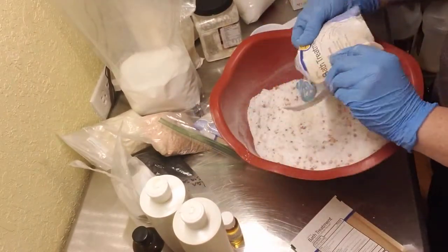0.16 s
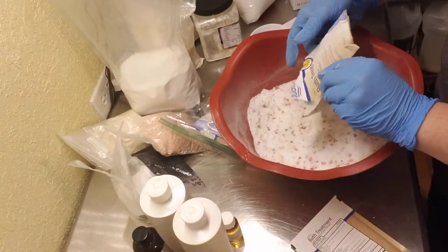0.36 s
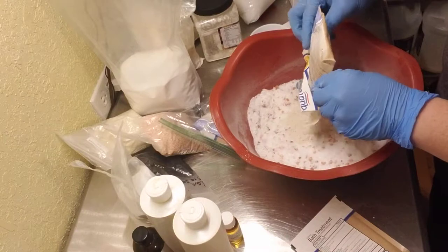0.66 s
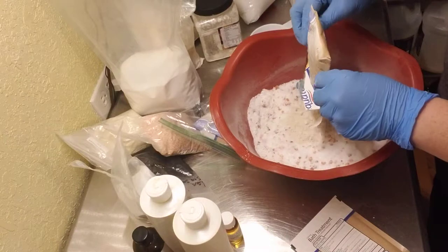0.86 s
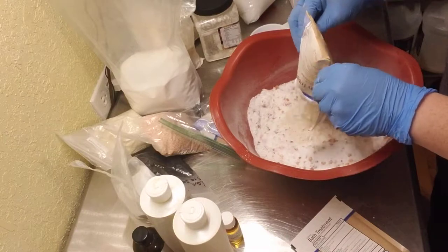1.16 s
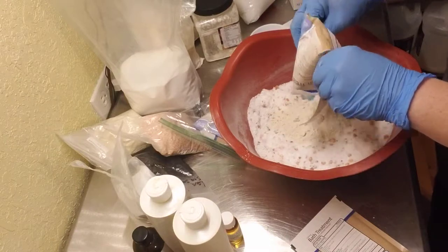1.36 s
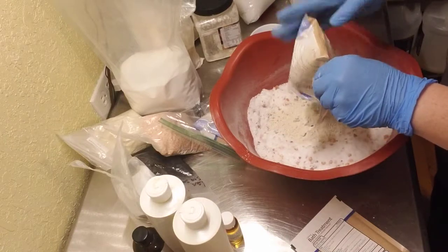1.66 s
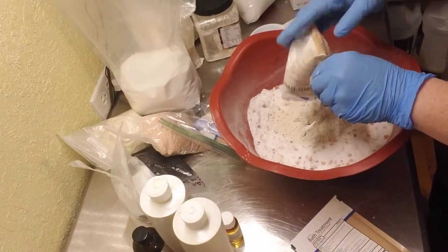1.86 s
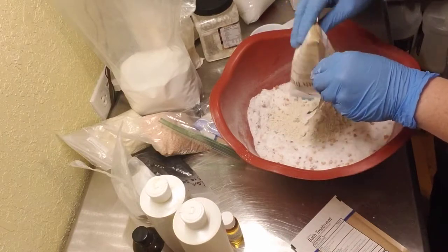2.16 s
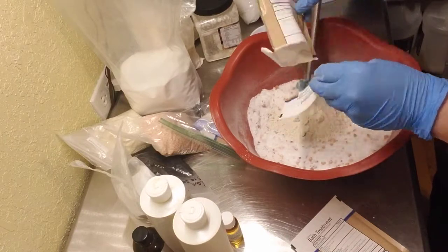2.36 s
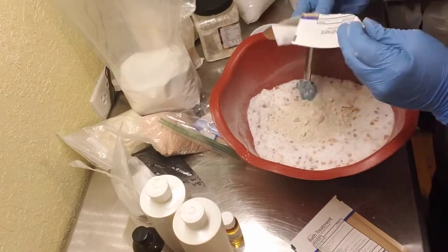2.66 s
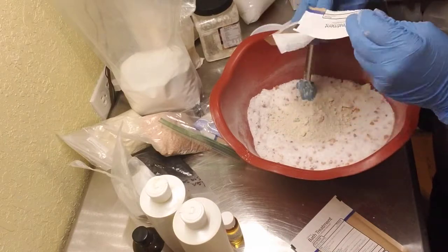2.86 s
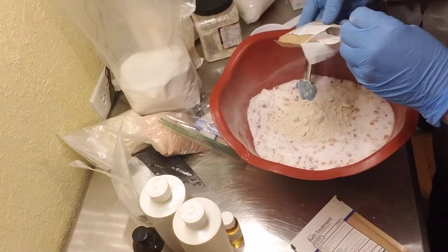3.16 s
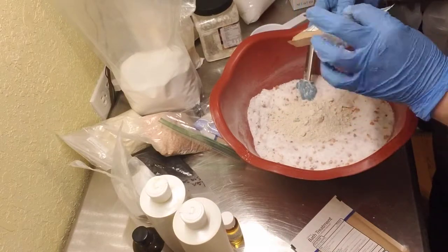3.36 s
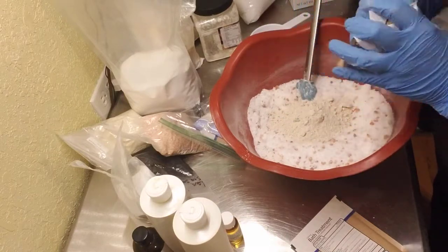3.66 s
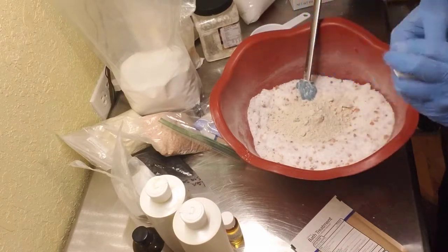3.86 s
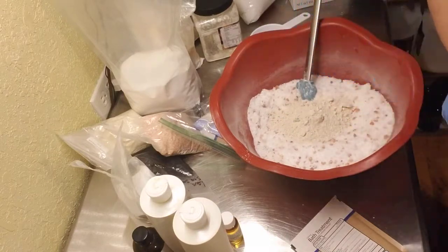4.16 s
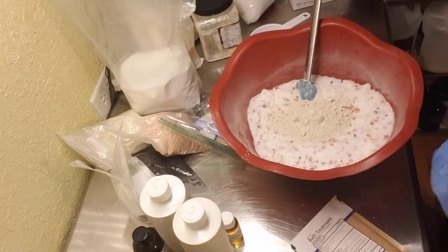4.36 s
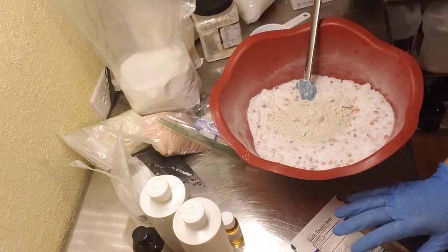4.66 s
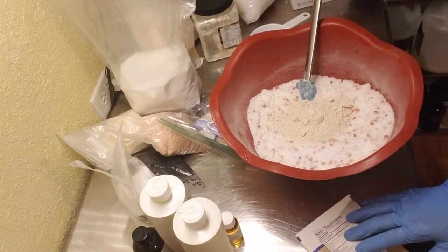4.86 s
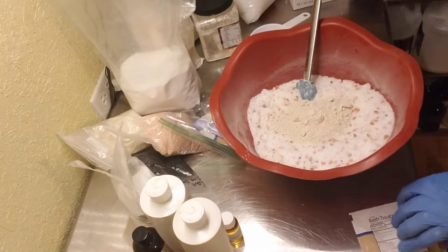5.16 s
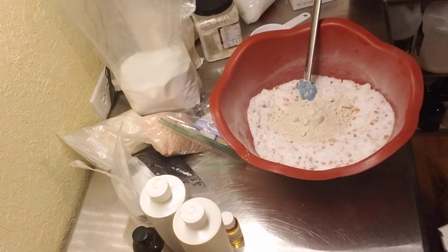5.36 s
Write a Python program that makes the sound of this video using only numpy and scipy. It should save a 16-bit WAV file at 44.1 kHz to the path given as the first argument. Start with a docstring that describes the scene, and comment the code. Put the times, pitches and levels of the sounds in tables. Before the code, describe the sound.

Close to a stereo microphone in a small room, a packet rustles and snaps in uneven bursts as it is shaken and slapped empty above a bowl. After a short lull it is crushed in a denser, brighter crackle. Then paper is dragged off a steel table with a brief swish and a slight rumble. A barely audible refrigerator hum and hiss lie underneath.

```python
"""A steel table in a small room, a wall close on the right of a stereo microphone.
Gloved hands shake, slap and crumple a small foil-lined packet over a bowl, then slide a sheet of paper
off the table. Creases snap and ring their panels over a fine crackle; the bowl rings along and the table
thuds. The wall answers each snap at once, the room after it. A refrigerator hums softly over the hiss."""
import sys
import numpy as np
from scipy import signal
from scipy.fft import rfft, irfft, next_fast_len
from scipy.io import wavfile
from scipy.ndimage import uniform_filter1d, map_coordinates

SR = 44100
rng = np.random.default_rng(int(sys.argv[2]) if len(sys.argv) > 2 else 0)


def persist_wave(psi):
    """Save psi, clipped to +-1, as 16-bit WAV."""
    counts = np.round(np.clip(psi, -1, 1) * 32767).astype(np.int16)
    wavfile.write(sys.argv[1], SR, np.atleast_2d(counts).T)


N = 243640

# Creases letting go: start_s, level_db, panel_hz, treble_db, pouch_db (the last two offset the level)
CREASES = [(0.161, -43, 2240, -11, 0.5), (0.229, -35.5, 3040, -2, -44), (0.3456, -25.5, 3690, -1.5, -9.5),
           (0.556, -47, 2200, -6, 1.5), (0.576, -42.5, 2120, -15, -0.5), (0.806, -33, 2180, 3, -7.5),
           (0.867, -37, 1390, -22, -11), (0.89, -38, 3560, 4, -3), (0.917, -28, 2810, 9.5, 0.5),
           (0.926, -29, 1400, -26, -13), (0.969, -22.5, 1330, -25, -16.5), (0.985, -28.5, 1750, -7, -15),
           (1.117, -32.5, 1670, -38, -49), (1.157, -24.5, 2470, -1.5, -11.5),
           (1.236, -21.5, 1450, -8.5, -19), (1.263, -20.5, 1540, -9, -10), (1.278, -19, 1670, -12.5, -5.5),
           (1.31, -27.5, 1390, 7.5, -31), (1.376, -29.5, 1430, -52, -22), (1.393, -32.5, 2390, -16.5, -11),
           (1.407, -28, 3650, 0, -9), (1.413, -30.5, 1660, 12.5, -10), (1.653, -37.5, 1500, -9, -5),
           (1.658, -19, 1340, -57, -19.5), (1.67, -23, 1230, -4.5, -45), (1.692, -27.5, 2410, -4, -11),
           (1.725, -27.5, 1750, -15.5, -15), (1.74, -20, 2650, -9, -21), (1.792, -29.5, 1270, -50, -11),
           (1.806, -23.5, 1380, -11, -24), (1.812, -26, 2380, 2.5, -2), (1.836, -22, 1840, -5.5, -23.5),
           (1.872, -23.5, 1480, -28, -13), (1.923, -24, 1360, -28, -11), (1.931, -25.5, 2770, -21, -0.5),
           (1.943, -25.5, 2020, 13, -6.5), (2.034, -34.5, 1380, -7, -6.5), (2.061, -34.5, 1930, -37, -30),
           (2.071, -23, 1430, -30, -15.5), (2.079, -27.5, 1500, -25, -17), (2.115, -28, 1980, 4, -9),
           (2.12, -24, 2200, -15, -3), (2.13, -25, 1910, -16.5, -3), (2.166, -27.5, 1420, -7, -23.5),
           (2.183, -20, 1570, 1, -17.5), (2.216, -18.5, 1640, -18.5, -46), (2.336, -37, 1630, -45, -38.5),
           (2.405, -35, 1660, -29, -47), (2.539, -64.5, 1350, 22, -32.5), (2.602, -29, 1930, -18, -16.5),
           (2.624, -21.5, 1700, -19, -25), (3.305, -30.5, 1490, -1, -41.5), (3.338, -34, 3520, -17, -42),
           (3.371, -33.5, 2100, 4.5, -7), (3.409, -24.5, 4140, -3.5, -13), (3.524, -26.5, 4170, 1, -42),
           (3.541, -37.5, 1580, 2.5, -25), (3.593, -31, 1890, 0.5, 1), (3.608, -41, 470, -24, -2),
           (3.653, -33, 2530, -5.5, -37), (3.696, -30, 2170, -9, -6), (3.722, -23.5, 1340, -15, -48),
           (3.773, -22.5, 1280, -7.5, -11.5), (3.783, -15.5, 1120, -14, -43), (3.788, -35, 1900, -20, -36),
           (3.797, -23.5, 2080, -1, -44), (3.854, -41.5, 4600, 9.5, -42), (3.881, -25, 2400, -3, -34),
           (3.912, -43.5, 1610, 23.5, -45), (3.96, -26.5, 4810, 1, -46), (4.009, -24.5, 2870, -1, -35),
           (4.019, -22.5, 2300, 0.5, -45), (4.09, -31.5, 5800, -4.5, -17), (4.104, -44, 6000, 25, -37),
           (4.115, -18, 2590, -6, -56), (4.161, -51.5, 2300, 24, -35), (4.185, -44, 3200, 13, -47),
           (4.191, -29, 6300, 5.5, -32), (4.203, -21.5, 2500, -6.5, -50), (4.24, -49.5, 2680, 15.5, -36),
           (4.273, -28.5, 6030, 3, -34), (4.284, -32, 2520, 0, -17), (4.379, -52, 4900, 10, -38),
           (4.487, -76.5, 1900, 40, -17), (5.293, -35, 2470, 13.5, -33), (5.365, -41, 2020, 2.5, -36)]
def crease_snaps():
    """A crease gives in a burst of slips: a bright tick, a ring of its panel, a puff of the pouch."""
    out, size = np.zeros((2, N + SR)), 16384
    t, f = np.arange(size // 8) / SR, np.fft.rfftfreq(size, 1 / SR)
    for start_s, level_db, hz, treble_db, pouch_db in CREASES:
        length_s = 0.0035 * np.exp(0.25 * rng.standard_normal() - 0.036 * treble_db)  # dull lasts longer
        slips = rng.standard_normal((3, len(t))) * amp(2 * rng.standard_normal(len(t)))
        slips *= amp(-60 * t / np.clip(length_s, .001, .08)) * (1 - np.exp(-t / (0.04 * length_s)))
        burst = rfft(slips / np.linalg.norm(slips, axis=1, keepdims=True), size)
        power = np.abs(uniform_filter1d(np.abs(burst) ** 2, size=200))
        burst /= np.sqrt(power + 0.015)  # a dry crack favours no pitch
        body = 2 * resonance(f, hz, hz * hz / 7000)  # small, high panels are damped most
        crack = amp(0.59 * treble_db + 5.5) * resonance(f, 2540, 5500)
        note = amp(-0.05 * np.clip(treble_db, -20, 20)) * resonance(f, hz, hz / 10)
        panel = (body + crack + note) * 1j * f / (1.053 * hz + 1j * f)  # small panels radiate no bass
        tick = amp(treble_db + 8) * resonance(f, 14860, 16600) ** 2
        puff = amp(pouch_db + 7) * resonance(f, 590, 1200) ** 2  # one push of air
        centre = burst[0] * panel + puff
        sides = burst[1:] * (tick + 0.67 * panel)
        snap = amp(level_db + 9) * irfft(centre + sides, size)
        snap[:, size // 4:] = 0  # cut the filters' wrapped-round end so no stray click follows the snap
        start = round(start_s * SR)
        out[:, start:start + size] += room(snap, wet_db=-1.5 - 0.12 * treble_db)
    return over_bowl(out[:, :N])


# How hard the hands work, one curve a gesture: time_s, creak_db, fizz_db
SHAKE_PACKET = [(0, -77, -60.5), (0.071, -84, -76), (0.14, -68, -62.5), (0.32, -66.5, -61),
                (0.58, -57.5, -52.5), (0.66, -66, -60.5), (0.76, -69.5, -51.5), (0.87, -58.5, -61),
                (1.03, -57.5, -48.5), (1.12, -67.5, -64), (1.35, -58.5, -52), (1.499, -70, -64),
                (1.629, -83, -76.5)]
SLAP_PACKET = [(1.646, -83, -74), (1.69, -48, -55), (1.79, -69, -55), (1.87, -55, -60.5),
               (1.99, -62.5, -52.5), (2.24, -56.5, -57), (2.32, -77, -70.5), (2.5, -66, -59),
               (2.58, -76, -64), (2.667, -53.5, -51.5), (2.765, -83.5, -78)]
CRUMPLE_PACKET = [(3.049, -88, -74), (3.106, -57, -49), (3.2, -62.5, -52), (3.3, -56, -52),
                  (3.514, -60, -58), (3.535, -42.5, -41.5), (3.66, -53.5, -50), (3.692, -56.5, -55.5),
                  (3.705, -48, -41), (3.75, -44.5, -44), (3.83, -48.5, -54), (3.875, -47, -51),
                  (3.9, -48, -48), (4.06, -46.5, -47), (4.26, -59.5, -54), (4.42, -76.5, -70)]
SLIDE_SHEET = [(4.475, -79, -81), (4.497, -61, -53), (4.6, -75.5, -71), (4.655, -68, -69),
               (4.665, -53, -70), (4.77, -63.5, -61.5), (4.785, -59.5, -47), (4.85, -54, -41),
               (4.94, -49, -32), (4.98, -53.5, -36), (5.02, -48.5, -33.5), (5.13, -50.5, -45),
               (5.27, -47.5, -44), (5.33, -58, -51), (5.42, -66.5, -62.5), (5.52, -68.5, -64.5)]
# A hand presses the pouch or sheet into a low scuff: start_s, level_db, held_s
HAND_PRESSES = [(0.277, -72.5, 0.0068), (0.964, -60.5, 0.01), (1.659, -49.5, 0.049), (1.819, -50, 0.032),
                (2.104, -66.5, 0.022), (3.33, -75, 0.2), (3.581, -53.5, 0.057), (3.771, -70.5, 0.057),
                (4.277, -56, 0.029), (4.664, -62, 0.036), (4.999, -58, 0.22)]
# Colours of the mid creak, high fizz and low flexing: frequency_hz, level_db
CREAK_SPECTRUM = [(290, -46.5), (500, -11), (768, -10), (1420, -2), (1520, -1), (2510, 1.5), (8000, -9.5),
                  (10400, -35.5), (17600, -120)]
FIZZ_SPECTRUM = [(1760, -55.5), (3000, -15), (7860, -4.5), (9060, -9), (15000, 4), (16200, -7),
                 (16500, -52)]
FLEX_SPECTRUM = [(70, -7.5), (180, -2.5), (500, 7), (1000, 0), (2200, -18)]
def rustle(balled_s=3.845, ball_hz=1010):
    """Film and paper creak, fizz and flex while the hands work them; a press swells the flexing."""
    times, *levels = np.transpose(SHAKE_PACKET + SLAP_PACKET + CRUMPLE_PACKET + SLIDE_SHEET)
    t, slide_s = np.arange(N) / SR, SLIDE_SHEET[0][0]
    creak_db, fizz_db = (np.interp(t, times, curve) for curve in levels)
    balled = np.clip((t - balled_s) * 10, 0, 1) * (t < slide_s)
    flexing = amp(-79.5 + 0.32 * (creak_db + 66) - 0.74 * balled)
    for start_s, level_db, held_s in HAND_PRESSES:
        attack = np.clip((t - start_s) / 0.0033, 0, 1)
        release = np.exp(-np.maximum(t - start_s - held_s, 0) / 0.025)
        flexing += amp(level_db) * attack * release
    # Sliding and light rubbing are smoother.
    roughness = (1 - 0.65 * (t > slide_s)) * np.clip((creak_db + 70) / 22, .4, 1)
    creak = amp(creak_db) * crackle(CREAK_SPECTRUM, roughness, spike_db=6, decay_s=0.006)
    fizz = amp(fizz_db) * crackle(FIZZ_SPECTRUM, roughness, spike_db=3.5, decay_s=0.004)
    flex = flexing * crackle(FLEX_SPECTRUM, roughness, spike_db=-2.5, decay_s=0.0011)
    lows = filtered(creak, lambda hz: 1 / (1 + (hz / ball_hz) ** 4))  # lost once crushed to a ball
    return over_bowl(creak - balled * lows) + fizz + flex


def crackle(spectrum, roughness, spike_db, decay_s, slips_per_s=400):
    """Tiny random slips of unequal size gate a noise that swells in clumps."""
    slipping = rng.random(N) < slips_per_s / SR
    sizes = amp(spike_db * np.minimum(rng.exponential(size=N), 2)) * roughness
    gate = signal.lfilter([1], [1, -np.exp(-1 / (decay_s * SR))], slipping * sizes) + 2.5
    clumps = amp(1.6 * roughness * wobble(25))
    return stereo_field(gate * clumps * rng.standard_normal((2, N)), spectrum)


# Modes of the bowl under the packet: pitch_hz, width_hz, level_db
BOWL_MODES = [(1258, 45, -3), (1442, 30, -3), (1633, 24, -1)]
def over_bowl(x, away_s=3.95):
    """The bowl rings along until the packet is carried away from it."""
    near = np.clip((away_s - np.arange(N) / SR) / 0.053, 0, 1)
    modes = lambda f: sum(amp(db) * resonance(f, hz, width) for hz, width, db in BOWL_MODES)
    return x + filtered(near * x, modes)


# Soft blows through the steel table: start_s, level_db, pitch_hz
TABLE_BLOWS = [(1.658, -63, 67.3), (1.808, -62.5, 146), (1.937, -67, 156), (3.601, -67, 128),
               (4.279, -64, 53.5), (4.899, -69, 59.7)]
def table_thuds(rise_s=0.005, t60_s=0.13):
    """Each blow sets the table top ringing on one low, soft-edged note."""
    out, t = np.zeros(N + SR), np.arange(SR // 4) / SR
    for start_s, level_db, hz in TABLE_BLOWS:
        envelope = amp(level_db + 14.5 - 60 * t / t60_s) * (1 - np.exp(-t / rise_s))
        out[round(start_s * SR):][:len(t)] += envelope * np.sin(2 * np.pi * hz * t)
    return out[:N]


def table_rumble(start_s=5.03, end_s=5.19, level_db=-59.5, pitch_hz=51.5):
    """The dragged sheet makes the table top rumble."""
    t = np.arange(N) / SR
    dragged = np.clip(np.minimum(t - start_s, end_s - t) / 0.012, 0, 1)
    rumble = filtered(rng.standard_normal(N), lambda f: resonance(f, pitch_hz, 50) ** 2)
    return amp(level_db) * dragged * unit(rumble)


# Echoes off the table and nearby walls: delay_s, left_db, right_db
EARLY_ECHOES = [(.0027, -14, -2), (.0052, -20, -12), (.007, -6, -20)]
# Decay of the small room: frequency_hz, t60_s
ROOM_DECAY = [(200, 0.41), (2000, 0.28), (6000, 0.36), (15000, 0.013)]
def room(x, wet_db):
    """Table and walls send early copies, then each frequency dies at its own speed."""
    out = x.copy()
    for delay_s, left_db, right_db in EARLY_ECHOES:
        lag = round(delay_s * SR)
        out[:, lag:] += amp([[left_db], [right_db]]) * x[::-1, :-lag]
    hz, t, noise = signal.stft(rng.standard_normal((2, SR // 4)), SR, nperseg=256)
    angle = spread_angle(hz)[:, None]
    diffuse = np.cos(angle) * noise[0] + np.sin(angle) * np.array([noise[1], -noise[1]])
    softened = amp(-2.5 * np.log2(1 + hz / 4000))[:, None]  # soft surfaces return less treble
    clutter = 2.84 * amp(-60 * t / 0.11)  # bags and jars close by scatter the first moments
    decay = amp(-60 * t / along(ROOM_DECAY, hz)[:, None])
    tail = signal.istft(diffuse * (clutter + decay) * softened, SR, nperseg=256)[1]
    tail /= np.linalg.norm(tail, axis=1, keepdims=True)
    return out + amp(wet_db) * signal.fftconvolve(x, tail, axes=1)[:, :x.shape[1]]


def refrigerator(pitch_hz=123.9, width_hz=4.1, level_db=-81.5):
    """A soft, wavering hum: one narrow band of noise."""
    hum = filtered(rng.standard_normal(N), lambda f: 1 / (1 + ((f - pitch_hz) / width_hz) ** 2))
    return amp(level_db) * unit(hum)


# The quiet room and the microphone's own hiss: frequency_hz, level_db
FLOOR_SPECTRUM = [(15, -42), (25, -11.5), (120, 1.5), (190, -11), (1040, -31), (1610, -18), (1740, -37.5),
                  (9570, -35.5), (16000, -17)]
def room_tone(level_db=-74):
    """Low room noise and hiss, flickering slightly in level."""
    gain = amp(level_db + 0.48 * wobble(12))
    return gain * stereo_field(rng.standard_normal((2, N)), FLOOR_SPECTRUM)


# Likeness of left and right at the microphone: frequency_hz, correlation
PORT_LIKENESS = [(40, 0.74), (130, 0.61), (300, 0.75), (600, 0.39), (1500, 0.17), (16000, 0)]
def spread_angle(hz):
    """Mid-side angle in radians: long waves reach both microphone ports much alike."""
    return np.arccos(np.clip(along(PORT_LIKENESS, hz), -1, 1)) / 2


def stereo_field(x, spectrum):
    """Two unrelated signals, coloured and mixed as mid and side; rms 1."""
    spread = lambda hz: [np.cos(spread_angle(hz)), np.sin(spread_angle(hz))]
    mid, side = filtered(x, lambda hz: amp(along(spectrum, hz)) * spread(hz))
    return unit(np.array([mid + side, mid - side]))


def amp(db):
    """dB to gain."""
    return 10 ** (np.asarray(db) / 20)


def unit(x):
    """Scaled to rms 1."""
    return x / np.sqrt(np.mean(x ** 2) + 1e-20)


def along(points, hz):
    """Interpolate (frequency_hz, value) points on a log axis."""
    f, values = np.transpose(points)
    return np.interp(np.log(hz + 1), np.log(f + 1), values)


def filtered(x, response):
    """x through a frequency response."""
    size = next_fast_len(N + SR // 2)
    return irfft(rfft(x, size) * response(np.fft.rfftfreq(size, 1 / SR)), size)[..., :N]


def wobble(rate):
    """A smooth random curve, rate knots a second."""
    return map_coordinates(rng.standard_normal(int(N * rate / SR) + 4), [np.arange(N) * rate / SR])


def resonance(f, hz, width):
    """A causal resonance of gain 1 at its centre."""
    return 1j * f * width / (hz * hz - f * f + 1j * f * width)


def scene():
    """Packet and paper in front, the table under them, the quiet room behind."""
    return crease_snaps() + rustle() + table_thuds() + table_rumble() + refrigerator() + room_tone()


# Balance of the microphone's two ports: frequency_hz, left_minus_right_db
PORT_BALANCE = [(100, -1.5), (700, 0.5), (2400, -1), (4400, -3), (8000, 0), (15000, -4)]
def record(dry, right_lag_s=5e-5, top_hz=16950):
    """The right port hears more treble, and a moment later; the top of the band falls away, then ends."""
    def response(hz):
        balance = amp(np.outer([.5, -.5], along(PORT_BALANCE, hz)))
        lag = np.exp(1j * np.pi * right_lag_s * np.outer([1, -1], hz))
        band_edge = amp(along([(15700, 4.0), (16000, -37.5), (16900, -26.0)], hz))
        return balance * lag * band_edge * (hz < top_hz)
    return filtered(dry, response)


dry = scene()
out = record(dry)
persist_wave(out)
```